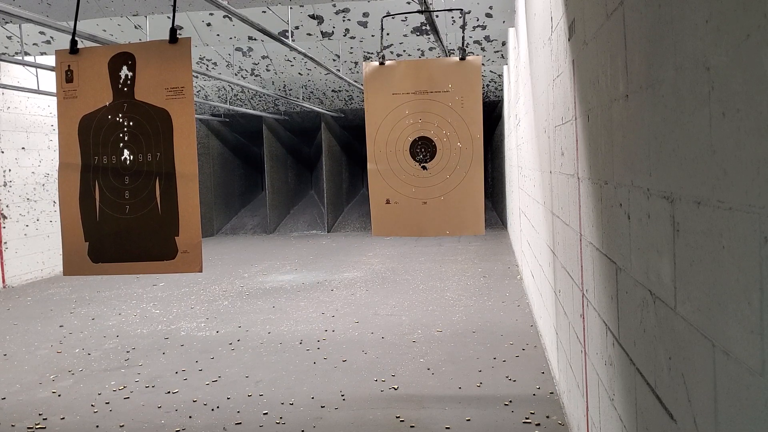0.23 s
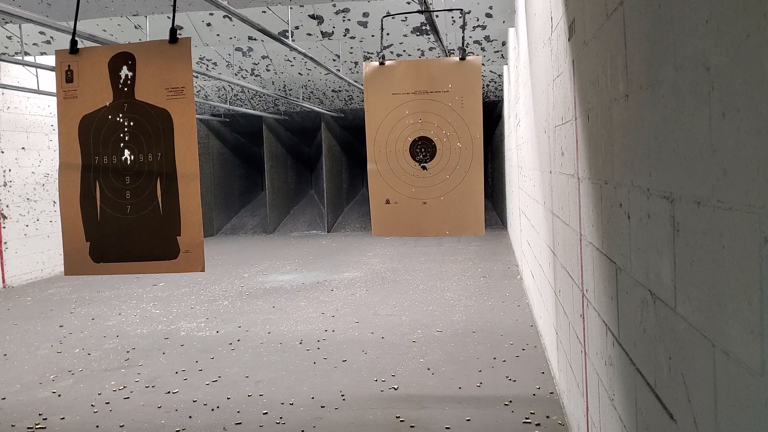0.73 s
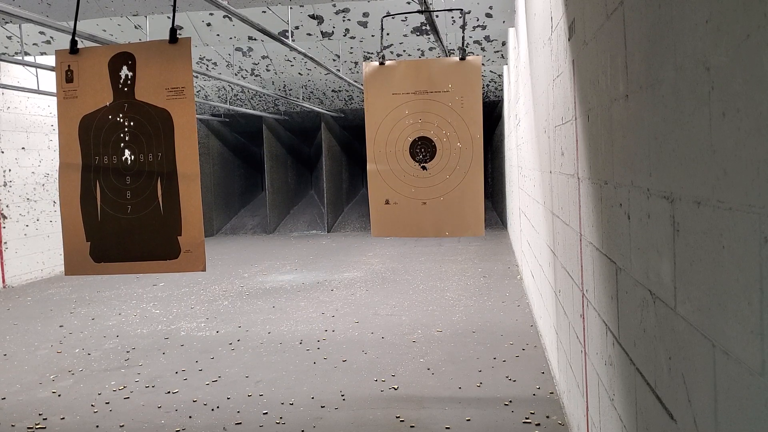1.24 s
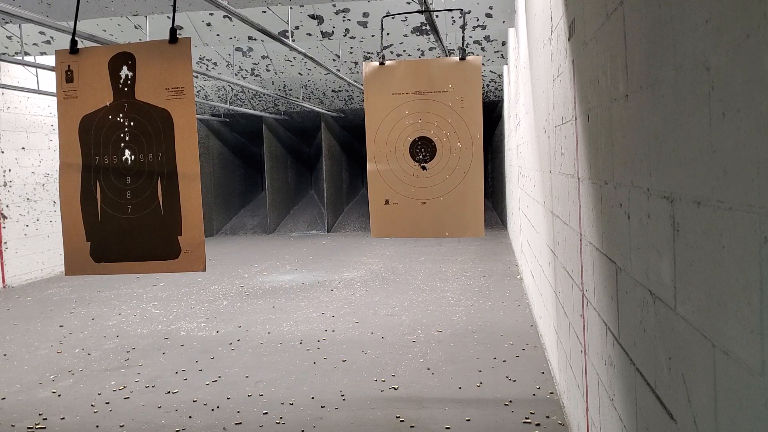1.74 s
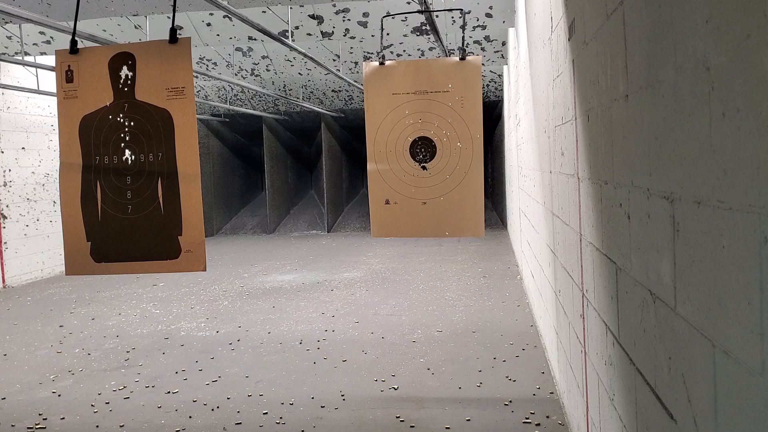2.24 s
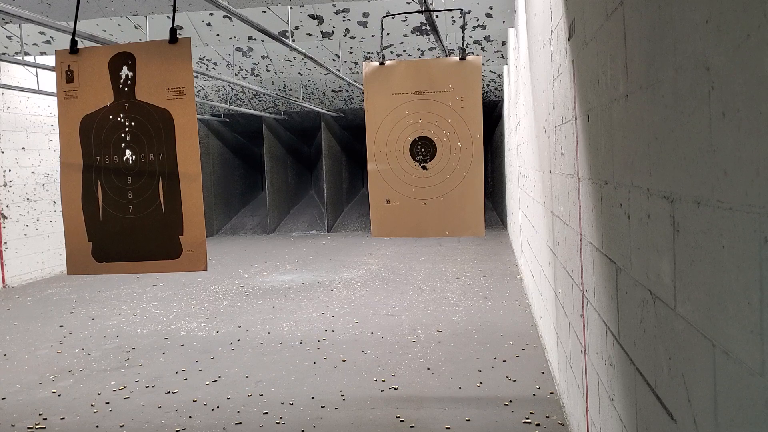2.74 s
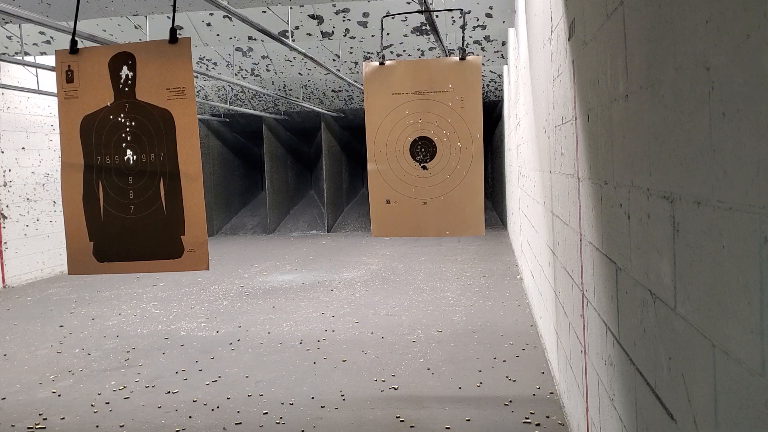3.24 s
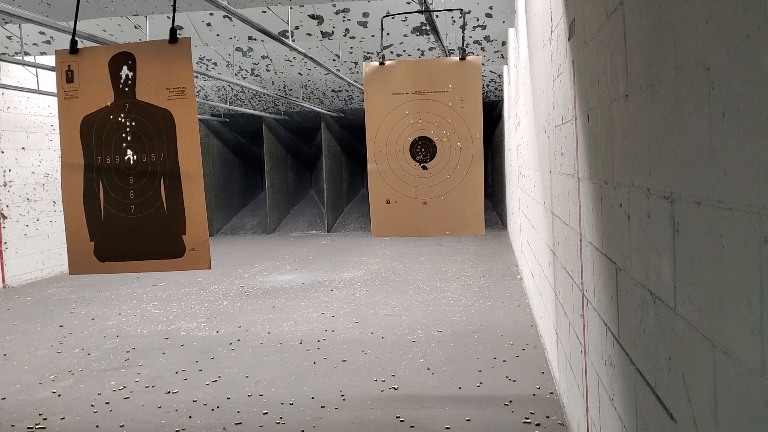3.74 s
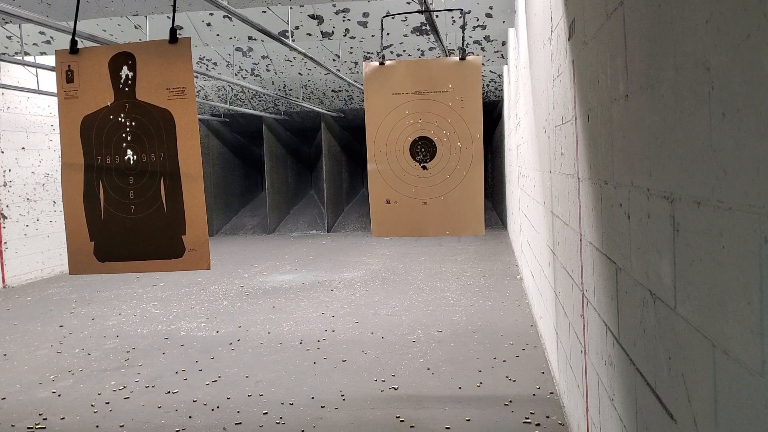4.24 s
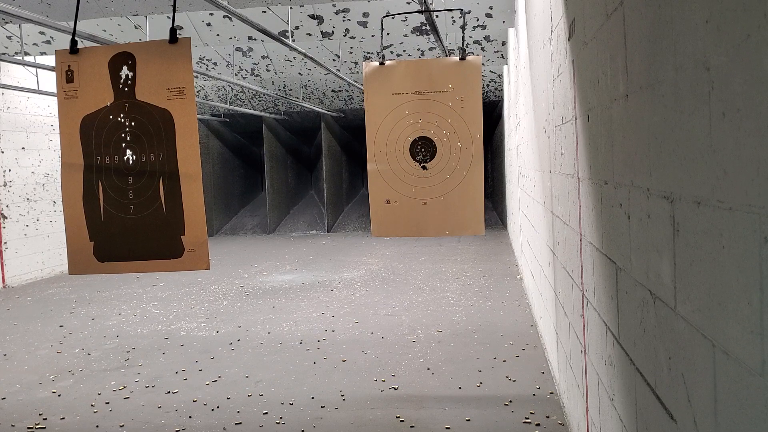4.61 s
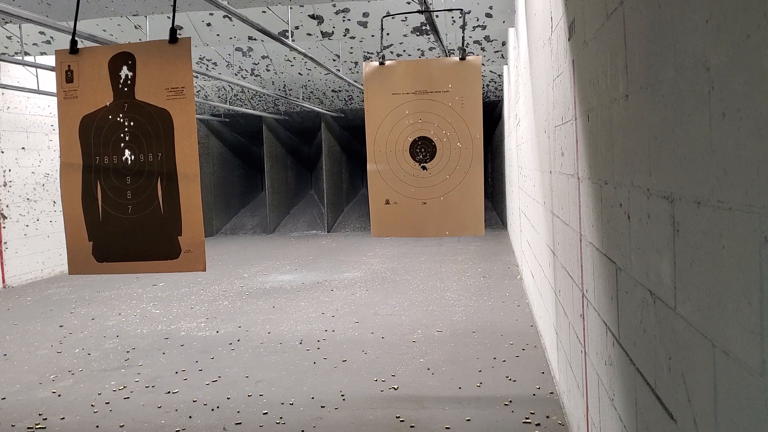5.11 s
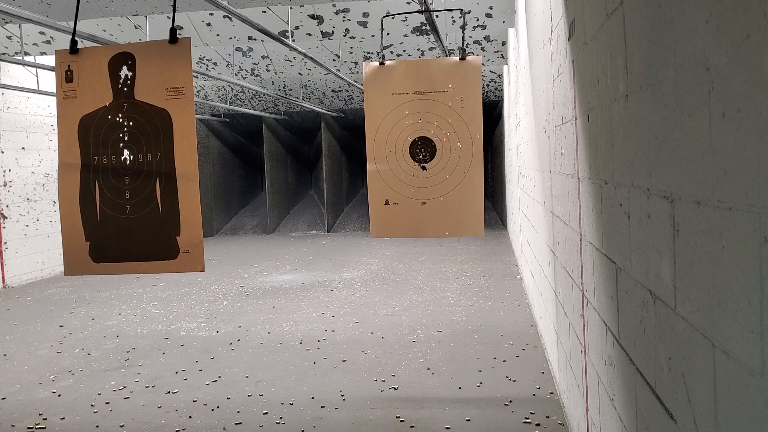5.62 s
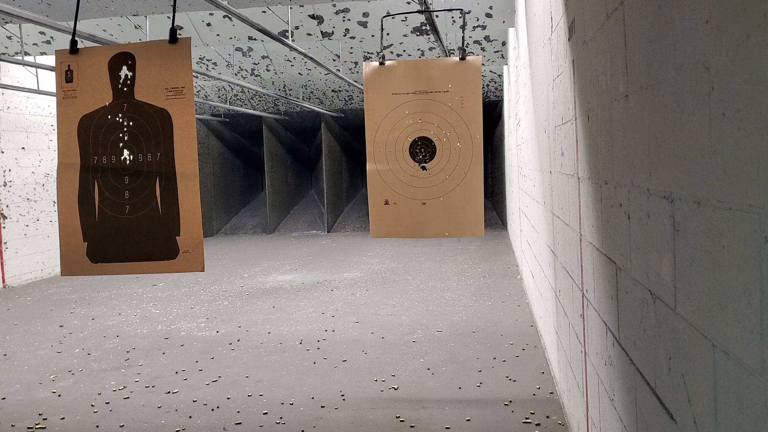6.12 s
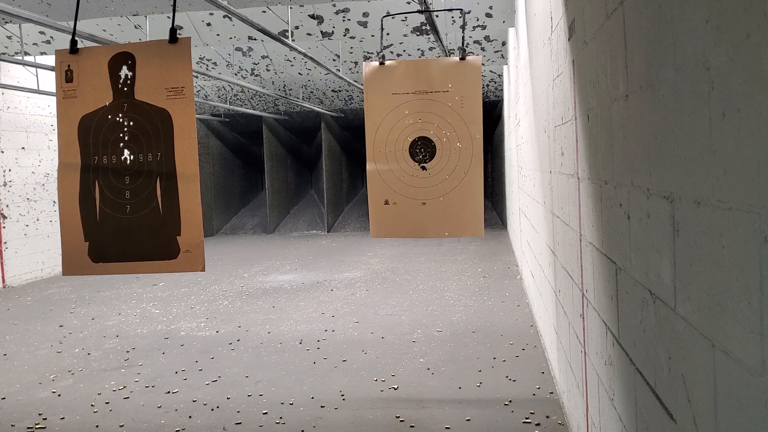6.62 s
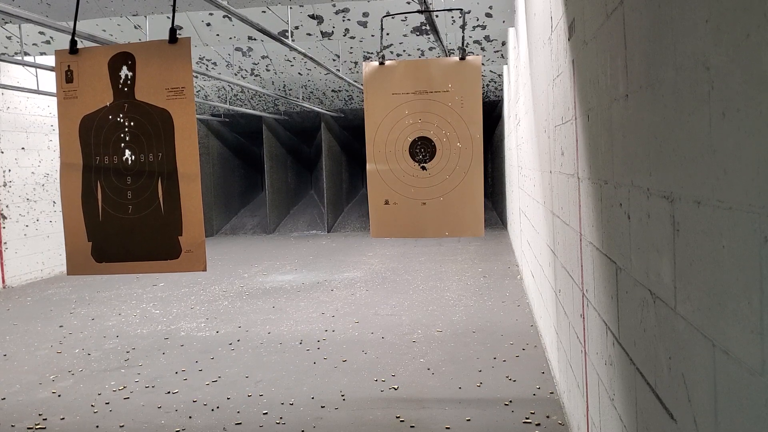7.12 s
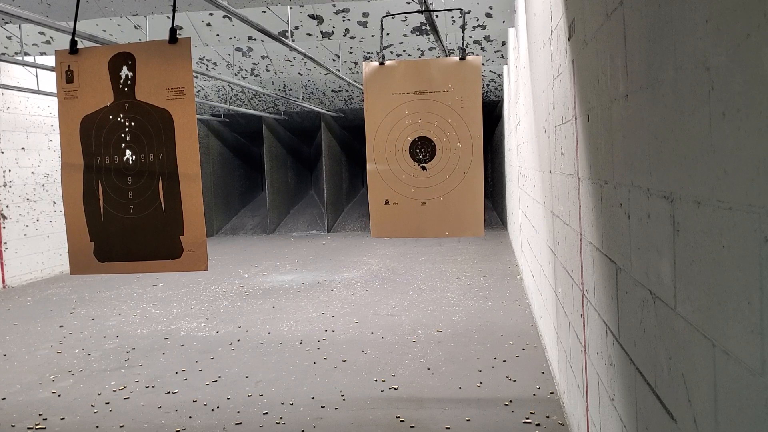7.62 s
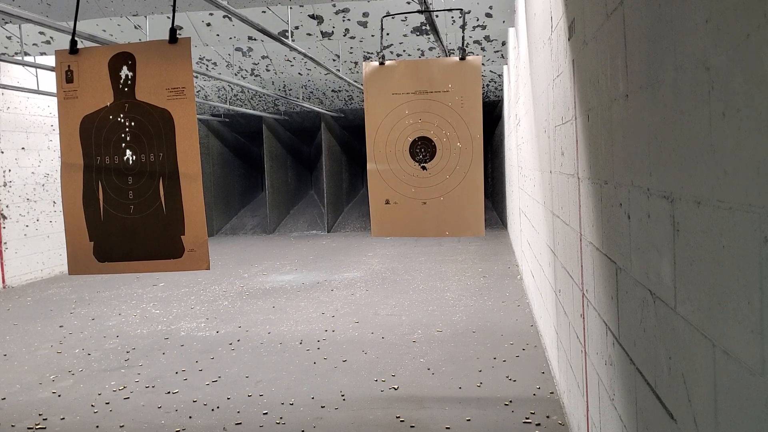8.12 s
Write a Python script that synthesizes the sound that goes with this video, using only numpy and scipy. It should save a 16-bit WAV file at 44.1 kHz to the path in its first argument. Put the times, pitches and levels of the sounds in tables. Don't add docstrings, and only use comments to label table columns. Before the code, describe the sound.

Constant low ventilation rumble and a slowly beating fan hum fill a hard concrete shooting range. Very close to the microphone, cloth rubs, a latch snaps and metal parts tap, sparse at first. After the middle, sharp taps and knocks grow louder and denser, with hollow scrapes, grinding jolts and small high brass pings cut short.

```python
import sys
import numpy as np
from scipy import signal
from scipy.fft import rfft, irfft
from scipy.io import wavfile
from scipy.ndimage import uniform_filter1d

SR = 44100
rng = np.random.default_rng(int(sys.argv[2]) if len(sys.argv) > 2 else 0)


def gain_from_db(level_db):
    decades = np.asarray(level_db, float) / 20
    return 10 ** decades


def put_to_file(sound):
    columns = np.atleast_2d(sound).T
    safe = np.clip(columns, -1, 1)
    whole_steps = np.round(safe * 32767)
    wavfile.write(sys.argv[1], SR, whole_steps.astype(np.int16))


N = 368676
TIME = np.arange(N) / SR


def evened(x):
    return x / np.sqrt(np.mean(x ** 2) + 1e-20)


def read(points, hz):
    f, value = np.transpose(points)
    return np.interp(np.log(hz + 1), np.log(f + 1), value)


def add(mix, start_s, sound):
    part = mix[:, round(start_s * SR):][:, :sound.shape[1]]
    part += sound[:, :part.shape[1]]


def resonate(x, hz, width_hz):
    turn = np.exp(2j * np.pi * np.cumsum(hz * np.ones(x.shape[-1])) / SR)
    r = np.exp(-np.pi * width_hz / SR)
    return 2 * (turn * signal.lfilter([1 - r], [1, -r], x / turn)).real


def band(x, low_hz, high_hz):
    return signal.sosfilt(signal.butter(2, [low_hz, high_hz], "band", fs=SR, output="sos"), x)


def hiss(spectrum, patchy_db, flicker_db):
    frames = N // 128 + 5
    patches = uniform_filter1d(rng.standard_normal((frames, 257)), 20, axis=0)
    patches = evened(uniform_filter1d(patches, 6, axis=1))
    flicker = evened(uniform_filter1d(rng.standard_normal((frames, 1)), 3, axis=0))
    gain = gain_from_db(patchy_db * patches + flicker_db * flicker).T
    z = signal.stft(rng.standard_normal((2, N + 512)), nperseg=512, noverlap=384)[2][:, :, :frames]
    field = signal.istft(z * gain[:, :z.shape[2]], nperseg=512, noverlap=384)[1]
    colour = gain_from_db(read(spectrum, np.fft.rfftfreq(N, 1 / SR)))
    return evened(irfft(rfft(field[:, :N]) * colour, N))


def line_noise():
    return rng.standard_normal((2, 6000, 2)) @ [1, 1j]


def narrow(z, hz, width_hz):
    off = (np.fft.rfftfreq(N, 1 / SR)[:z.shape[1]] - hz) / width_hz
    return z / (1 + 4 * off ** 2) * N / np.sqrt(width_hz * N / SR)


def swells(rows, rest_db):
    t = TIME[::64]
    peak_s, level_db, rise_s, fall_s = np.transpose(rows)[..., None]
    slope = np.maximum((peak_s - t) / rise_s, (t - peak_s) / fall_s)
    power = gain_from_db(level_db - 20 * slope) ** 2
    return np.interp(TIME, t, np.sqrt(power.sum(0) + gain_from_db(rest_db) ** 2))


def clicks(rows):
    out, t = np.zeros((2, N)), TIME[:2600]
    fade = np.hanning(2 * len(t))[len(t):]
    for start_s, peak_db, body_hz, contact_ms, tick_db, treble_db in rows:
        u = 1000 * t / contact_ms
        push = (u * np.exp(1 - u)) ** 1.6
        rattle = 0.17 * (1 - np.exp(-u)) * gain_from_db(-60 * t / 0.1)
        contact = rng.standard_normal((2, len(t))) * (push + rattle)
        body = resonate(resonate(contact, body_hz, 0.4 * body_hz), body_hz, 1.6 * body_hz)
        parts = body, band(contact, 530, 10600), band(contact, 11800, 18500)
        body, tick, snap = (p / abs(p).max() for p in parts)
        sound = body + gain_from_db(tick_db - 3) * tick + gain_from_db(treble_db - 4) * snap
        add(out, start_s - .0006, gain_from_db(peak_db + 3) * sound * fade)
    return out


# start_s, peak_db, body_hz, contact_ms
KNOCKS = [(1.212, -24, 1210, 5), (1.631, -24, 2500, 1.6), (2.726, -26, 996, 4.6), (3.421, -23.5, 2060, 7.6),
          (3.703, -25, 1990, 1.05), (3.854, -32.5, 3930, 1.1), (4.793, -28, 2600, 1.2),
          (4.872, -24.5, 2330, 2.3), (5.208, -35, 2640, 4), (5.473, -29.5, 2730, 1.43),
          (5.764, -8.5, 532, 1.58), (5.773, -10.5, 1020, 1.12), (6.265, -33, 1037, 4.6),
          (6.634, -12, 1300, 3.24), (6.755, -18, 2140, 3.64), (6.756, -17, 1093, 4.2),
          (6.771, -24, 2560, 1.56), (7.146, -20, 930, 0.39), (7.54, -17, 1060, 0.76),
          (7.653, -8.5, 1960, 1.49), (7.685, -10.5, 1175, 2.72), (7.835, -25, 720, 4.2),
          (7.911, -15.5, 1380, 1.75), (8.067, -24, 1070, 5), (8.145, -19.5, 2030, 2.75),
          (8.338, -17, 1280, 1.65)]


def knocks():
    return clicks([(*row, -37.5, -32.5) for row in KNOCKS])


# start_s, peak_db, body_hz, contact_ms
TAPS = [(.222, -19, 2230, 2), (0.941, -27, 2350, 5.45), (1.682, -29, 2600, 1.2), (1.708, -30.5, 2100, 0.89),
        (3.359, -21, 777, 1.7), (3.408, -19.5, 1990, 1.58), (3.809, -23.5, 2200, 0.71),
        (3.945, -30, 1070, 0.69), (4.161, -27.5, 2400, 1.8), (4.727, -12, 2250, 2.26),
        (4.798, -25, 2660, 1.75), (4.864, -26, 2480, 2.1), (4.896, -15, 2380, 3.67),
        (4.91, -16.5, 1880, 0.64), (4.916, -14, 2500, 2.44), (5.228, -18, 2350, 1.0),
        (5.338, -3.5, 2810, 0.247), (5.565, -22, 3000, 3.5), (5.771, -9, 2855, 2.54),
        (6.622, -9.5, 1254, 1.53), (6.697, -11.5, 1320, 3.9), (6.781, -20, 1570, 0.82),
        (6.833, -32.5, 2150, 1.4), (6.989, -26, 2580, 1.03), (7.492, -28, 1160, 0.7),
        (7.59, -21.5, 1280, 28), (7.897, -25.5, 1280, 2.9), (8.313, -27.5, 1030, 1.3)]


def taps():
    firm_db, tick_db_per_db = -14, .6
    rows = []
    for row in TAPS:
        softer_db = tick_db_per_db * min(row[1] - firm_db, 0)
        rows.append((*row, -7.5 + softer_db, -10 + softer_db))
    return clicks(rows)


# start_s, peak_db,
# body_hz, contact_ms, treble_db
SNAPS_AND_CATCHES = [(.115, -22.5, 2900, 1.93, 9), (.129, -19.5, 2930, 1.08, -6), (.239, -24, 2690, 3, -3),
                     (1.799, -21, 2230, 1.25, -10), (2.323, -23, 3640, 3.5, 0), (2.348, -15, 7000, 1.3, -14.5),
                     (4.112, -25, 3770, 0.99, -7), (5.245, -18, 2710, 1.67, 2), (5.341, -16, 2750, 3, -3),
                     (5.353, -13, 2300, 2.4, 0), (5.762, -17.5, 3200, 2.22, -5.5), (6.856, -23.5, 2140, 0.85, -17),
                     (6.933, -23, 1740, 2.71, -14), (6.952, -22.5, 2270, 1.09, -14), (7.257, -36.5, 1020, 0.81, -29),
                     (7.512, -23, 5200, 2.5, -2), (7.761, -28, 890, 2.1, 8), (8.135, -27, 2800, 5.1, -23),
                     (2.331, -13.5, 2500, 1.4, 0), (2.341, -20.5, 2150, 2.5, -8), (2.353, -26, 6050, 2.3, -14.5),
                       (3.354, -31.5, 2440, 5, -18), (4.136, -34, 3000, 2.24, -25), (5.763, -18, 3400, 3.1, -15.5),
                       (5.778, -26, 1900, 5, -25), (6.94, -24.5, 4200, 1.45, -3), (7.52, -33, 6000, 3, 12),
                       (1.212, -32, 2570, 14, -25), (2.729, -31.5, 1800, 11, -25), (6.634, -33, 5500, 1.2, -8),
                       (6.621, -28, 5200, 1, -12), (7.896, -29, 7000, 2.5, 13), (7.654, -24, 5000, 1.5, 0),
                       (7.686, -25.5, 2600, 3.7, -2), (7.916, -31, 1700, 4.3, -26.5), (4.729, -22.5, 2396, 3.2, -23),
                       (5.239, -26, 2900, 1.5, 3), (6.701, -23.5, 3990, 2.65, -18.5), (6.697, -30, 6500, 1.2, -12),
                       (3.945, -36, 7500, .6, 5)]


def latches_and_catches():
    return clicks([(*row[:-1], 2, row[-1]) for row in SNAPS_AND_CATCHES])


# start_s, peak_db, body_hz, contact_ms
GRAINS = [(1.217, -16, 1300, 3), (1.299, -30, 1270, 4), (1.318, -25, 1300, 5), (3.706, -29, 2050, 2.5),
          (3.81, -30, 3900, 2), (3.83, -33, 3000, 1.5), (6.637, -19, 2400, 3.2), (6.646, -26, 1500, 3),
          (6.651, -29, 3800, 1), (6.699, -20, 2300, 4), (6.711, -24, 1500, 4), (6.724, -28, 1500, 4),
          (6.759, -19, 2500, 3), (6.946, -25, 2000, 2), (7.573, -30, 750, 2), (7.592, -25, 1500, 2),
          (7.603, -25, 1160, 3), (7.622, -27, 1500, 3), (7.634, -26, 1100, 3), (7.644, -26, 2400, 3),
          (7.666, -18, 1200, 4), (7.692, -22, 700, 2), (7.699, -24, 1300, 3), (7.715, -29, 1200, 1.5),
          (7.655, -15, 680, 2), (7.676, -21, 1300, 3), (6.703, -18, 700, 4), (7.916, -21, 720, 2),
          (8.146, -24, 1200, 3), (5.358, -20, 900, 1.5), (2.349, -17, 2200, 2), (7.921, -22, 1100, 3),
          (7.93, -24, 1400, 3), (7.945, -30, 2200, 2)]


def grains():
    return clicks([(*row, -24, -30) for row in GRAINS])


# start_s, peak_db, pitch_hz, t60_s, facing (1 alike in both ports, -1 opposed)
BODIES = [(3.424, -28.5, 1923, 0.057, 0.26), (4.118, -23.5, 1170, 0.0445, -0.15),
          (4.864, -31.5, 2583, 0.039, 0.88), (4.872, -27, 2452, 0.075, .4),
          (4.897, -15, 1001, 0.054, -1.05), (4.898, -28.5, 2657, 0.058, 0.77),
          (4.918, -7.5, 1150, 0.037, -0.977), (4.918, -14.5, 2902, 0.019, 0.1),
          (4.922, -23, 2180, 0.025, .8), (5.208, -29.5, 2764, 0.088, 0.72),
          (5.229, -14, 1213, 0.036, -0.97), (5.228, -33.5, 2400, 0.049, 0.95),
          (5.239, -31.5, 2640, 0.0275, 0.71), (5.34, -15, 2772, 0.035, 0.63),
          (5.357, -22.5, 2227, 0.035, -0.34), (5.365, -31, 2054, 0.037, .3),
          (5.567, -25.5, 2137, 0.034, 0.88), (5.568, -27, 3860, 0.0235, 0.64),
          (5.763, -12, 2130, 0.043, -0.985), (5.763, -11, 1124, 0.0357, -0.47),
          (5.772, -17, 2001, .05, -1.15), (6.622, -16, 1234, 0.036, -1.05), (6.637, -6, 1200, 0.054, -0.91),
          (6.696, -2, 1185, 0.042, -0.948), (6.698, -12.5, 2840, 0.025, -0.906),
          (6.706, -17, 1030, 0.052, -1.1), (6.757, -9, 1019, 0.049, -1.01),
          (6.756, -21.5, 2117, 0.059, -0.52), (6.773, -20.5, 1044, 0.042, -1.1),
          (6.773, -25, 2685, 0.031, 0.79), (6.834, -32.5, 2122, 0.055, 0.42),
          (6.934, -21, 1397, 0.069, -0.99), (6.933, -19, 3200, 0.018, 0.024),
          (6.94, -29, 2265, 0.073, 0.14), (7.146, -25.5, 1119, 0.044, -0.98),
          (7.492, -25, 1092, 0.028, 0.8), (7.654, 4.5, 1328, 0.0109, 0.19), (7.686, -19, 1111, 0.046, 0.59),
          (7.836, -13.5, 685, 0.0274, 0.18), (7.913, -2, 1305, 0.0142, 0.14)]


def bodies():
    out, t = np.zeros((2, N)), TIME[:SR // 10]
    for start_s, peak_db, hz, t60_s, facing in BODIES:
        same, turn = read(PORT_LIKENESS, hz), 2 * np.pi * hz * t
        lags = 0, np.arccos(np.clip(facing, -1, 1))
        left, right = (np.sin(turn - lag) + gain_from_db(-5) * np.sin(1.17 * turn - lag) for lag in lags)
        paths = np.array([left, (right - same * left) / np.sqrt(1 - same ** 2)])
        decay = gain_from_db(peak_db - 60 * (t / (0.553 * t60_s)) ** 1.5)
        add(out, start_s, decay * (1 - np.exp(-t * hz / 1.4)) * paths)
    return out


# start_s, peak_db, pitch_hz, t60_s
RINGS = [(3.36, -35.5, 865, 0.13), (3.39, -22, 838.5, 0.153), (3.705, -23.5, 996, 0.066),
         (3.856, -30.5, 3980, 0.044), (4.727, -15, 4186, 0.03), (4.727, -14.5, 3156, 0.026),
         (4.735, -19.5, 1105, 0.059), (4.798, -34, 1094, .09), (4.901, -17, 1000, 0.082),
         (5.356, -6, 684, 0.0186), (5.569, -27.5, 3590, 0.0214), (5.764, -36, 575, 0.085),
         (5.785, -18, 563, 0.105), (7.836, -22, 1423, 0.02), (5.748, -32, 3607, 0.097)]


def rings():
    out, t = np.zeros((2, N)), TIME[:SR // 8]
    for start_s, peak_db, hz, t60_s in RINGS:
        wave = np.sin(2 * np.pi * (hz * t + rng.random((2, 1))))
        if hz < 1150:
            wave = wave[:1] * [[1], [-.1]]
        add(out, start_s, gain_from_db(peak_db - 60 * t / t60_s) * (1 - np.exp(-t * hz / 0.51)) * wave)
    return out


# start_s, length_s, level_db, tube_hz, loss_db (per overtone)
SCRAPES = [
    (1.206, 0.096, -24, 1302, 11),
    (1.281, 0.22, -28.5, 1245, 10),
    (2.731, 0.17, -33.5, 1103, 10),
    (4.878, 0.024, -28.5, 2490, 22),
    (5.793, 0.26, -27.5, 1062, 4.5),
]


def scrapes():
    out = np.zeros((2, N))
    for start_s, length_s, level_db, tube_hz, loss_db in SCRAPES:
        u = np.linspace(0, 1, int(length_s * SR))
        grip = evened(uniform_filter1d(rng.standard_normal(len(u)), 200))
        rough = rng.standard_normal((2, len(u))) * gain_from_db(1.2 * grip)
        tube = 0
        for k in range(3):
            hz, width_hz = tube_hz * (k + 1), (130 + 14 * loss_db) * (1 + k * loss_db / 9)
            tube = tube + gain_from_db(-loss_db * k) * resonate(resonate(rough, hz, width_hz), hz, 1100)
        add(out, start_s, gain_from_db(level_db - 14.7 * u) * evened(tube) * signal.windows.tukey(len(u), .15))
    return out


# start_s, peak_db, damped_after_s
SHELL = [
    (6.645, -44.5, 0.061),
    (6.835, -35.5, 0.057),
    (7.515, -34, 0.07),
    (7.615, -40, 0.059),
    (7.761, -29.5, 0.127),
    (7.982, -41, 0.14),
]
# pitch_hz, level_db, t60_s
SHELL_MODES = [
    (10960, 1, 0.184),
    (11030, -8.5, 0.54),
    (11055, -3, 0.62),
]


def shell():
    out, t = np.zeros((2, N)), TIME[:SR // 4]
    for start_s, peak_db, damped_after_s in SHELL:
        ring = 0
        for hz, level_db, t60_s in SHELL_MODES:
            turns = rng.normal(1, 0.001433) * hz * t + rng.random((2, 1))
            ring = ring + gain_from_db(level_db - 60 * t / t60_s) * np.sin(2 * np.pi * turns)
        finger = np.clip((damped_after_s - t) / 0.0053, 0, 1)
        add(out, start_s, gain_from_db(peak_db) * ring * (1 - np.exp(-t / 0.00113)) * finger)
    return out * gain_from_db([[3], [-3]])


# peak_s, level_db, rise_s, fall_s, middle_db (share of middle tones)
SWEEPS = [(0.0, -47, .1, 0.28, 1), (.21, -50, 0.255, 0.112, -2.5), (1.23, -45.5, 0.42, .25, -5.5),
          (1.34, -38.5, 0.263, 0.203, -2), (1.87, -46.5, 0.232, 0.187, 4),
          (2.19, -38.5, 0.255, 0.257, -8.5), (2.335, -38.5, 0.053, 0.153, -13.5), (2.46, -65, 1, 0.077, 25),
          (3.33, -47, 0.077, 0.39, 2), (3.44, -40.5, 0.28, 0.156, -3), (3.77, -74.5, 0.64, 0.09, 17.5),
          (4.57, -58, 1, 0.41, 5.5), (4.9, -51, 0.294, 0.068, 9), (5.33, -50, 0.384, 0.032, 5.5),
          (5.79, -46.5, 0.079, 0.122, 7.5), (6.83, -36.5, 0.21, 0.197, -5),
          (7.675, -40.5, 0.148, 0.0544, 2), (8.15, -52, 0.33, 0.44, 2), (8.33, -50, .15, .3, -15),
          (1.225, -41, .04, .06, -20)]
# peak_s, level_db, fall_s, middle_db
FLICKS = [
    (.63, -49, 0.17, 1),
    (2.73, -45.5, 0.17, 1.5),
    (3.96, -45.5, 0.11, 0.5),
    (5.24, -50.5, 0.244, 9),
    (7.41, -45.5, 0.048, -6),
    (7.51, -41, 0.11, -17.5),
    (7.78, -46, 0.116, -2.5),
    (7.906, -40, 0.098, -2),
]
# pitch_hz, density_db (per Hz)
RUB_TREBLE = [(3000, -25), (5000, -4.5), (7400, 6), (8600, 6), (9800, 2.5), (14500, -1.5), (16000, 3)]
# pitch_hz, density_db (per Hz)
RUB_MIDDLE = [(400, 9), (800, 4), (1300, -14), (2500, 1), (4500, -8), (7500, -9), (8600, -45)]


def cloth():
    flick_rise_s, folds_linger = 0.033, 2.03
    strokes = SWEEPS + [(s, db, flick_rise_s, fall_s, middle_db) for s, db, fall_s, middle_db in FLICKS]
    light = [row[:-1] for row in strokes]
    heavy = [(s, db + middle_db, rise_s, folds_linger * fall_s) for s, db, rise_s, fall_s, middle_db in strokes]
    fibres = hiss(RUB_TREBLE, patchy_db=.8, flicker_db=1.0) * swells(light, rest_db=-68)
    folds = hiss(RUB_MIDDLE, patchy_db=1.5, flicker_db=1.5) * swells(heavy, rest_db=-57.5)
    return gain_from_db(5.2) * fibres + gain_from_db(8.5) * folds


# start_s, length_s, level_db, pitch_hz, peak_place (0-1)
LEAKS = [(.25, 0.18, -65.5, 11780, 0.43), (0.279, 0.183, -51, 7710, 0.41),
         (0.549, 0.305, -50.5, 7670, 0.25), (1.317, 0.54, -54, 7734, 0.2), (1.493, 0.6, -50, 7197, 0.54),
         (1.555, 0.55, -61, 11600, .95), (1.766, 0.234, -50, 7687, 0.33), (1.973, 0.355, -48, 6986, 0.71),
         (2.949, 0.75, -65, 11940, 0.48), (3.659, 0.727, -48.5, 7252, 0.27),
         (3.603, .55, -62.5, 12280, 0.71), (4.6, 0.08, -61.5, 7830, .95), (5.877, 0.296, -62, 7720, 0.32),
         (6.967, 0.8, -52.5, 7751, 0), (6.971, 0.36, -64.5, 11800, 0.38), (7.47, 0.106, -53, 7860, 0.1),
         (7.921, 0.077, -49, 7800, 0.39), (8.152, 0.089, -52, 7830, 0), (3.62, .072, -49, 4050, .8),
         (.42, .35, -66, 11700, .3), (1.6, .55, -64, 11950, .5), (2.0, .3, -56, 7700, .2)]


def leaks():
    out = np.zeros((2, N))
    for start_s, length_s, level_db, hz, peak_place in LEAKS:
        u = np.linspace(0, 1, int(length_s * SR))
        tone = resonate(resonate(rng.standard_normal((2, len(u))), hz, 57), hz, 97)
        tone *= gain_from_db(2.2 * evened(uniform_filter1d(rng.standard_normal(len(u)), 1500)))
        shape_db = -11.5 * abs(u - peak_place) / max(peak_place, 1 - peak_place)
        add(out, start_s, gain_from_db(level_db + shape_db + 4.5) * evened(tone) * signal.windows.tukey(len(u), .1))
    return out


# peak_s, level_db, rise_s, fall_s
BEATS = [(.45, -52, 1.93, 1.7), (1.2, -28.5, 1.75, 0.3), (1.63, -19.5, 0.35, 0.2),
         (1.83, -21.5, 0.077, 0.655), (2.28, -21, 0.45, 0.2), (2.72, -23, 0.2, 0.25),
         (3.14, -28.5, 0.138, 0.156), (3.45, -29.5, 0.21, 0.72), (3.84, -30.5, 0.52, 0.155),
         (4.05, -22, 0.055, 0.253), (4.42, -26.5, 0.14, 0.604), (5.22, -30, 1.73, 0.26),
         (5.7, -32.5, 1.1, 0.36), (6.05, -33, 0.114, 2.47), (7.12, -21.5, 0.09, 0.367),
         (7.47, -27, 0.068, 0.384), (8.08, -34, 0.4, 1.07)]


def blade():
    blade_hz, width_hz = 328.5, 4.5
    core = np.sin(2 * np.pi * (blade_hz * TIME + rng.random((2, 1))))
    waver = irfft(narrow(line_noise(), blade_hz, width_hz), N)
    return swells(BEATS, rest_db=-45) * evened(core + 0.4 * waver)


# pitch_hz, density_db (per Hz)
AIR = [(18, -54), (26, 0.5), (105, -6), (140, -14.5), (250, -15.5), (400, -10), (450, -20.5), (650, -20),
       (900, -25.5), (1150, -25.5), (3000, -37), (7800, -51.5), (8400, -47), (15500, -75)]
# pitch_hz, width_hz, level_db
FAN = [(29.56, 2, -38.5), (44.11, 2.4, -34.5), (57.2, 3.77, -35), (73.3, 10.3, -35.5), (90.1, 2, -43.5),
       (105.64, 4.07, -40), (173.86, 3.03, -46), (228.14, 4.5, -45.5), (271.7, 1.06, -48.5),
       (297.5, 1.7, -46), (318.53, 5.1, -41.5), (341.2, 3.64, -42.5), (364, 7, -39.5), (404, 5, -45)]
# time_s, level_db
FLOW = [(0.0, -21), (2.89, -23), (6.24, -23), (6.45, -25.5), (6.77, -22.5), (8.29, -23.5), (8.36, -23)]


def ventilation():
    z = line_noise()
    out = gain_from_db(-26.5) * hiss(AIR, patchy_db=1.1, flicker_db=0.06)
    out = out + 0.434 * irfft(sum(gain_from_db(db) * narrow(z, hz, width_hz) for hz, width_hz, db in FAN), N)
    for hz, _, level_db in FAN:
        out = out + 0.773 * gain_from_db(level_db) * np.sin(2 * np.pi * (hz * TIME + rng.random((2, 1))))
    time_s, flow_db = np.transpose(FLOW)
    return out * gain_from_db(np.interp(TIME, time_s, flow_db - flow_db.mean()))


# pitch_hz, t60_s
HALL = [(500, 0.255), (2000, 0.1295), (8000, 0.0385)]


def hall(x):
    hz, t, z = signal.stft(rng.standard_normal((2, SR // 2)), SR, nperseg=256)
    tail = signal.istft(z * gain_from_db(-60 * t / read(HALL, hz)[:, None]), SR, nperseg=256)[1]
    return signal.fftconvolve(x, tail / np.linalg.norm(tail[0]), axes=1)[:, :N]


def scene():
    near = knocks() + taps() + latches_and_catches() + grains() + rings() + scrapes()
    held = bodies()
    around = shell() + cloth() + leaks() + blade() + ventilation()
    return around + near + held + gain_from_db(-12) * hall(near + gain_from_db(-11) * held)


def top_cut(x):
    return signal.sosfilt(signal.butter(12, 16840, fs=SR, output="sos"), x)


# pitch_hz, likeness (-1 to 1)
PORT_LIKENESS = [(30, .994), (70, .997), (140, .97), (240, .82), (345, .88), (385, -.1), (430, -.55),
                 (1200, -.55), (2600, -.2), (5000, .01)]
# pitch_hz, lean_db
PORT_LEAN = [(110, -.3), (200, -2.5), (380, -4.5), (700, .5), (1290, -1.2), (4400, -2), (8100, -2.5),
             (15000, -1.2)]
# pitch_hz, gain_db
PORT_CAVITY = [(7850, 1.5), (8150, -9), (10000, -6), (12500, 5.5)]


def record(dry):
    hz = np.fft.rfftfreq(N, 1 / SR)
    a, b = rfft(dry)
    same, lean_db = np.clip(read(PORT_LIKENESS, hz), -1, 1), read(PORT_LEAN, hz)
    left = a * gain_from_db(lean_db / 2)
    right = (same * a + np.sqrt(1 - same ** 2) * b) * gain_from_db(-lean_db / 2)
    ports = np.array([left, right]) * gain_from_db(read(PORT_CAVITY, hz))
    ports = ports / (1 + (hz / 15800) ** 300)
    loaded = np.tanh(irfft(ports, N))
    mix = irfft(rfft(loaded) * (hz < 16780), N)
    return top_cut(mix)


dry = scene()
out = record(dry)
put_to_file(out)
```